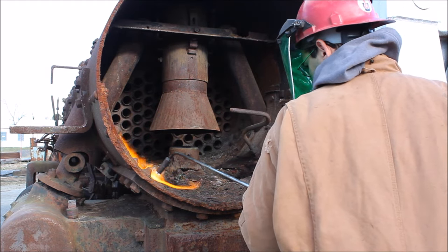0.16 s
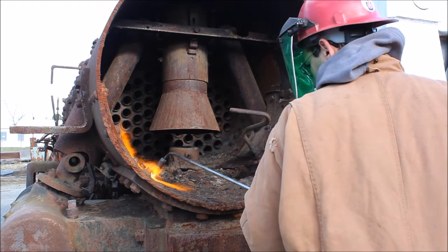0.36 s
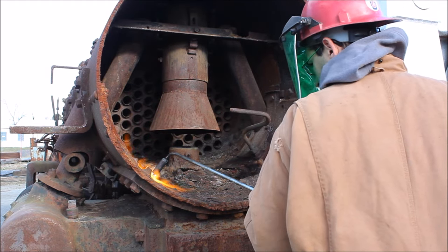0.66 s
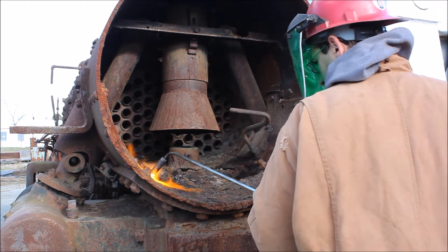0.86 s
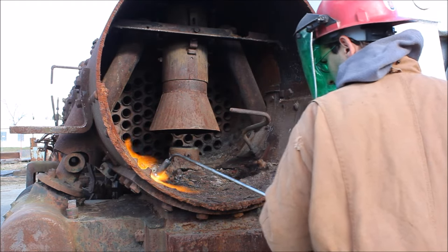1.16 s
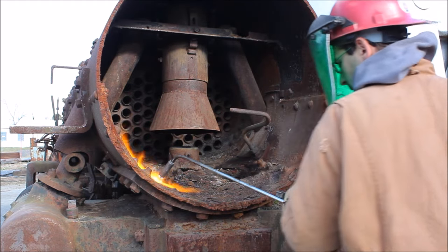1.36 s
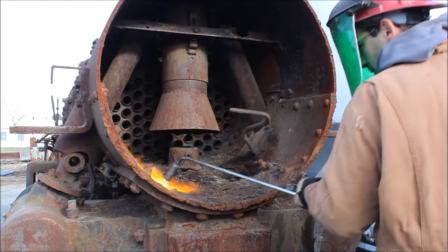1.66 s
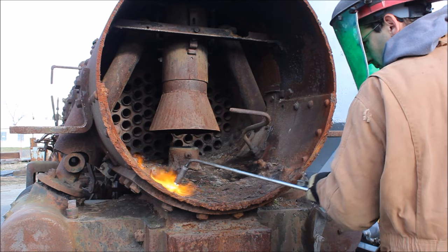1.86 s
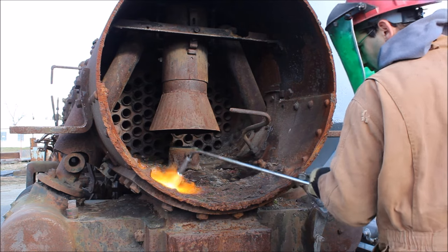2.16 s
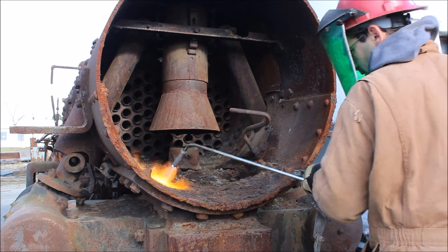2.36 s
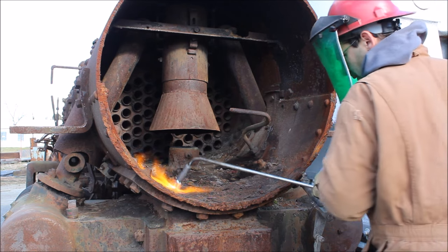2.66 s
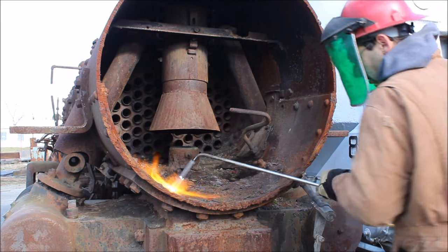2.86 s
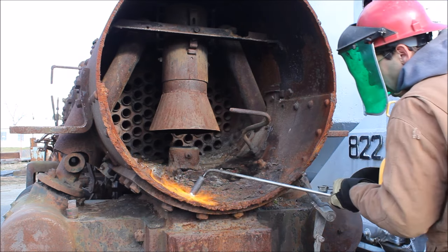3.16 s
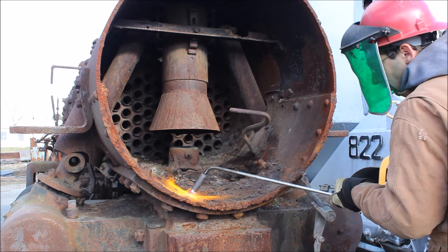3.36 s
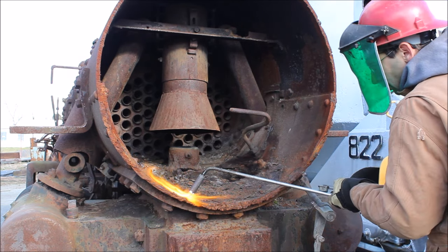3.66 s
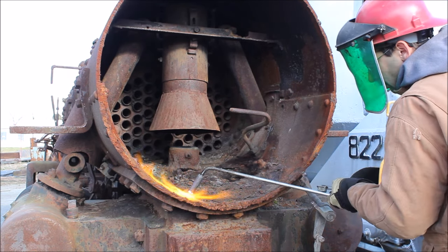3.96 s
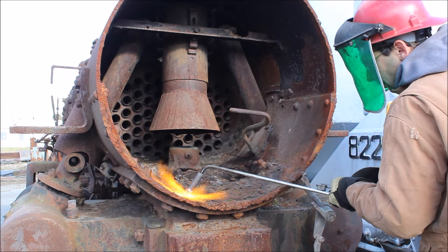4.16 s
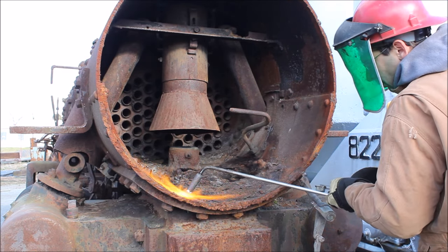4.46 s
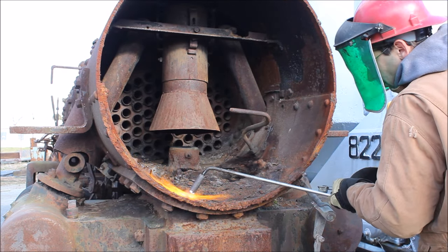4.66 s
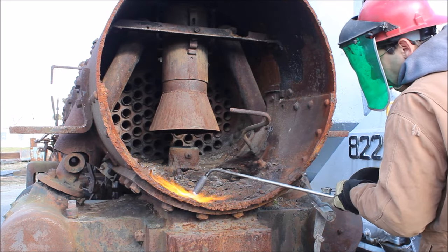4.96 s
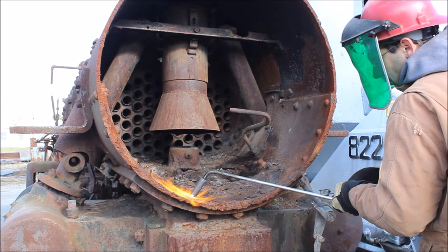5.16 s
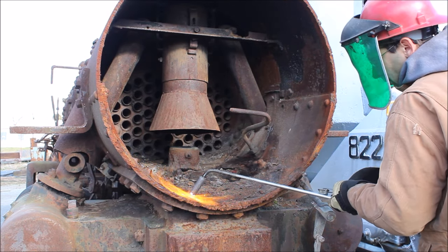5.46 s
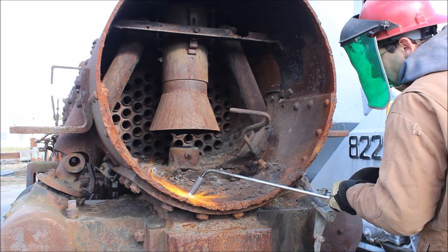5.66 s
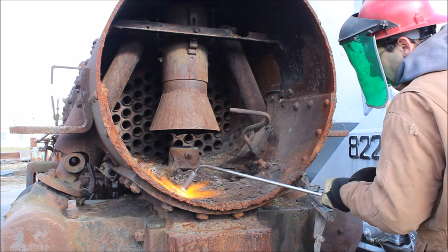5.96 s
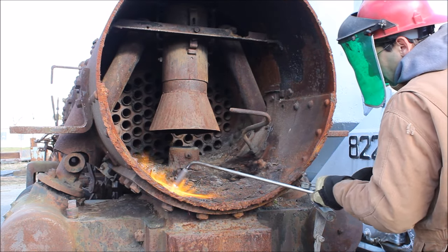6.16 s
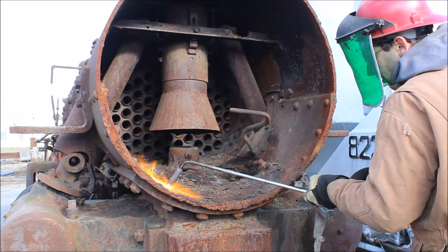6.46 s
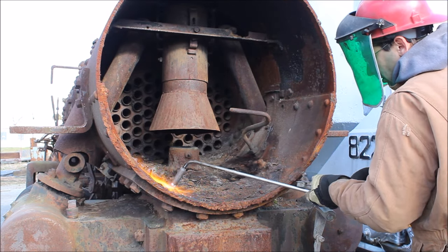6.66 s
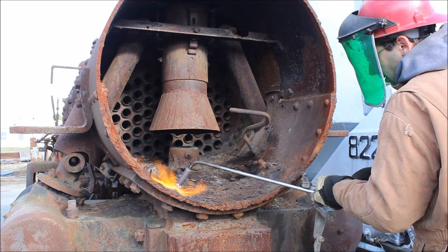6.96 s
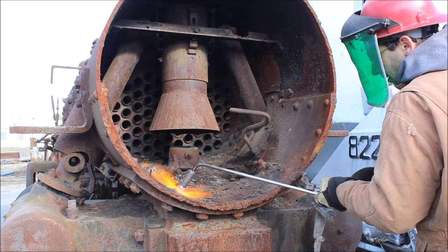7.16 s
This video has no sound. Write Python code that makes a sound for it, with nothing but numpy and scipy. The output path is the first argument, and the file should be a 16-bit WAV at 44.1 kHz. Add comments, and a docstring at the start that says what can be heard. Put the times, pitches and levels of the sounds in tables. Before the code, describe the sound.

A gas torch burns for the whole seven seconds or so, aimed into the mouth of a large rusty steel drum outdoors and heard through one nearby microphone. The main sound is a bright, turbulent hiss with a fine sizzle on top, swelling and sagging slightly as the nozzle moves. Beneath it a softer flame roar flickers, and the round wall gives both a hollow, shifting colour. The sizzle flares several times between about 2 and 3 seconds, and again near 4 and 6 seconds. Wind buffets the microphone in irregular low rumbles and short soft thumps, strongest in the first third of a second and again from about 5.5 to 7 seconds. Scattered throughout, the noise thins for a split second to faint glassy tones, most noticeably near 3.9, 4.1, 5.5 and 6.6 seconds. The torch is still burning at the end.

```python
"""Gas torch in a steel drum

A heating torch plays on rust and dirt in the mouth of a large steel drum, out of doors. The turbulent
jet hisses and fizzes, the flame roars, and the round wall reflects both a few milliseconds late.
Wind buffets the single microphone in low lumps; now and then the sound thins for an instant to a few
glassy tones."""
import sys
import numpy as np
from scipy import signal
from scipy.fft import rfft, irfft, next_fast_len
from scipy.io import wavfile
from scipy.ndimage import uniform_filter1d, map_coordinates

SR = 44100
rng = np.random.default_rng(int(sys.argv[2]) if len(sys.argv) > 2 else 0)


def persist_wave(psi):
    """Save psi, clipped to +-1, as 16-bit WAV."""
    counts = np.round(np.clip(psi, -1, 1) * 32767).astype(np.int16)
    wavfile.write(sys.argv[1], SR, np.atleast_2d(counts).T)


N = 321930
TIME = np.arange(N) / SR
FFT_SIZE = next_fast_len(N + 8192)
FREQ = np.fft.rfftfreq(FFT_SIZE, 1 / SR)

# the jet swells and sags as the nozzle sweeps: (time [s], level [dB])
JET_LEVEL = [(0.0, -24.5), (0.1, -21), (0.22, -23.5), (0.28, -18.5), (0.34, -24), (0.36, -19), (0.98, -19),
             (1.02, -17), (1.16, -21), (1.42, -19), (1.48, -23), (1.68, -18.5), (2.36, -21), (2.46, -24),
             (2.56, -21.5), (2.66, -19.5), (2.79, -17.5), (2.86, -24), (2.93, -20.5), (3.27, -18),
             (3.64, -20), (3.66, -17.5), (3.88, -19), (3.92, -22.5), (4.0, -20), (4.25, -22), (4.29, -18),
             (4.63, -20.5), (4.65, -18), (5.29, -19.5), (5.77, -18.5), (5.81, -22), (5.98, -20),
             (6.04, -22), (6.49, -18.5), (7.3, -19.5)]


def torch(roar_gain, jet_gain):
    """Turbulent burning: one flicker modulates the amplitude of roar, hiss and fizz together."""
    flicker = amp(0.5 * wobble(22))
    return flicker * (roar_gain * flame_roar() + jet_gain * (jet_hiss() + jet_fizz()))


def jet_hiss():
    """Jet turbulence radiates broadband noise, brighter or hollower as the nozzle turns."""
    # spectra of the two bands: (frequency [Hz], relative level [dB])
    upper_band = [(2530, -39), (4300, -0.5), (5860, 1), (7380, -3.5), (8000, -5.5), (10400, -56),
                  (17600, -120)]
    hollow_band = [(1290, -26), (2200, -4), (2340, -8.5), (2770, 0.5), (3390, 1.5), (4300, -2), (5590, -64),
                   (9460, -120)]
    # hollow band against upper band: (time [s], balance [dB])
    balance = [(0, 1), (.5, -3), (.8, 3.5), (.95, 1), (1.1, -1), (1.3, 2), (1.75, 0), (2.0, 0.5), (2.4, -4),
               (2.8, 1.5), (3.1, -0.5), (3.3, -1), (3.6, 0.5), (4.0, -3.5), (4.35, 2), (4.7, -0.5),
               (5.1, 0), (5.5, -2), (5.85, -1.5), (6.0, -3), (6.3, -0.5), (6.6, -0.5), (7.0, -1.5),
               (7.3, 3)]
    upper, hollow = rush(upper_band, patchy_db=1.5), rush(hollow_band, patchy_db=0.7)
    jet = blend(upper, hollow, curves(balance)[0] - 1.5 * wobble(3.7))
    level_db = curves(JET_LEVEL)[0] + 0.12 * wobble(25) + 0.58 * wobble(9.9)
    return amp(level_db) * drum(jet)


def jet_fizz():
    """The highest jet noise partly follows the jet's level and brightens as it flares."""
    # spectra of the fizz and of the sizzle above it: (frequency [Hz], relative level [dB])
    fizz_band = [(4100, -24.5), (7000, -3.5), (8200, 2), (10200, -1.5), (12000, -59)]
    sizzle_band = [(8500, -44), (10200, -2), (12400, -0.5), (14500, -3.5), (15500, -3.5)]
    # sizzle against fizz: (time [s], balance [dB])
    brightness = [(0, 3), (1.9, 1.5), (2.8, 2.5), (3.6, 1), (4.0, -2.5), (4.3, 2.5), (6.3, -1), (7.3, 4.5)]
    # Gaussian swells: (time [s], half width [s], rise [dB])
    flares = [(.22, 0.064, 2.5), (.75, 0.28, 1), (1.443, 0.094, 3), (1.72, 0.06, 1.5), (1.933, 0.017, 5),
              (2.09, 0.055, 5.5), (2.357, 0.071, 7), (2.65, 0.045, 4.5), (2.868, 0.1, 6), (3.088, 0.028, 4),
              (3.257, 0.025, 3.5), (3.427, 0.08, 1.5), (3.753, 0.12, 3), (4.11, 0.066, 4.5),
              (4.488, 0.053, 1.5), (5.105, 0.05, 2.5), (5.325, 0.059, 1.5), (5.71, 0.055, 1.5),
              (5.92, 0.16, 2), (6.16, 0.043, 4), (7.045, 0.033, 4)]
    flare_db = sum(db * np.exp(-((TIME - s) / width) ** 2) for s, width, db in flares)
    fizz = drum(rush(fizz_band, patchy_db=2.0))
    sizzle = amp(1.8 * wobble(45) + 0.26 * wobble(22)) * rush(sizzle_band, patchy_db=-0.5)
    spray = blend(fizz, sizzle, curves(brightness)[0] + 0.41 * flare_db)
    jet_db = curves(JET_LEVEL)[0]
    level_db = -22.5 + 0.39 * (jet_db - jet_db.mean()) + flare_db + 0.15 * wobble(8.9)
    return amp(level_db) * spray


def flame_roar():
    """Combustion noise excites the air in the drum; two shelving filters vary its low end."""
    # spectrum of the flame: (frequency [Hz], relative level [dB])
    roar_band = [(260, -17), (450, -10.5), (600, -19), (800, -4.5), (1300, -2), (2600, -2.5), (3380, -33),
                 (5720, -120)]
    # strength of the flame: (time [s], level [dB], low shelf drive [dB])
    flame = [(0, -31.5, 2), (.2, -28, -1.3), (1.0, -27, -3), (1.12, -28.5, -5), (1.4, -27, 2),
             (1.52, -29.5, -1), (1.7, -26.5, -4.5), (2.0, -28.5, 1), (2.1, -31, -0.5), (2.44, -33, 3),
             (2.6, -31.5, 7), (2.73, -26.5, 3.5), (2.85, -29.5, 2), (3.2, -30.5, -1), (3.55, -32, 1),
             (3.7, -28, 0.7), (3.9, -35.5, -0.5), (4.2, -30, -1.8), (4.85, -28.5, 1), (5.3, -31.5, -3.5),
             (5.7, -32, 3), (6.0, -33.5, -0.5), (6.45, -27.5, 1), (6.75, -29.5, 2), (7.0, -29.5, 4),
             (7.3, -27, 0.5)]
    # swings of the deepest roar: (time [s], deep shelf drive [dB])
    depth = [(0, 1), (.7, -1), (1.2, 2.5), (1.7, -0.5), (2.3, 2.5), (2.9, 2), (3.4, -0.5), (3.9, -2.5),
             (4.4, -2), (5.0, -3), (5.5, -1), (6.0, -0.5), (6.6, -3), (7.3, 1)]
    # shelf shapes: (frequency [Hz], gain [dB])
    low_shelf = [(850, -3.5), (1300, -51)]
    deep_shelf = [(590, 2.5), (640, -40)]
    level_db, low_db = curves(flame)
    roar = amp(level_db + wobble(12)) * drum(air_modes(rush(roar_band, patchy_db=1.5)))
    roar += (amp(low_db) - 1) * coloured(roar, low_shelf)
    return roar + (amp(curves(depth)[0]) - 1) * coloured(roar, deep_shelf)


def air_modes(x):
    """Cavity resonance: each mode interferes with the direct sound, leaving a hollow above its peak."""
    # modes of the air in the drum: (frequency [Hz], bandwidth [Hz], strength [dB])
    modes = [(517, 6.6, -10), (641.6, 20, 23), (749, 76, 7), (1040, 21, -4), (1170, 25, -2.5),
             (1267, 19, 5), (1680, 130, -3.5), (1838, 22, -5), (2157, 35, -1)]
    response = sum(amp(db) * width * (1j * FREQ + hz / 2) / (hz ** 2 - FREQ ** 2 + 1j * FREQ * width)
                   for hz, width, db in modes)
    return irfft(rfft(x, FFT_SIZE) * (amp(6) + response), FFT_SIZE)[:N]


def drum(x):
    """Comb filtering: wall echoes add to the direct sound, their delays trembling with the flame."""
    # delays as the torch moves: (time [s], near rim [ms], side wall [ms], tube plate [ms], far wall [ms])
    paths = [(0, 3.4, 4.9, 6.76, 8.2), (1.2, 3.44, 6.17, 7.2, 11.2), (1.9, 1.98, 6.06, 8.2, 9.7),
             (2.6, 1.15, 5.5, 8.7, 13.3), (3.7, 1.27, 5.54, 7.2, 9.3), (4.1, 2.43, 5.35, 7.1, 9.15),
             (5.5, 2.68, 4.83, 8.4, 10.4), (6.1, 3.3, 5.9, 9.3, 11.2), (7.3, 2.9, 6.5, 7.1, 8.8)]
    # strength of each path: (gain [dB])
    path_db = [-11, -5.5, -5, -4]
    # colour of an echo from the rusty wall: (frequency [Hz], gain [dB])
    rust = [(500, -13), (2000, -1.5), (5000, 3), (12000, 2.5)]
    reflected = coloured(x, rust)
    delays_ms = [ms + 0.029 * wobble(2.884) for ms in curves(paths)]
    echoes = [map_coordinates(reflected, [np.arange(N) - ms * SR / 1000], order=1) for ms in delays_ms]
    # later bounces blur into a short ring that changes colour as the flame wanders
    ring_time, rt60_s = np.arange(SR // 8) / SR, 0.2
    rings = rng.standard_normal((3, len(ring_time))) * amp(-60 * ring_time / rt60_s)
    tails = signal.fftconvolve(reflected[None], rings / np.linalg.norm(rings[0]), axes=1)[:, :N]
    weights = np.array([wobble(1.6) for _ in tails])
    tail = np.sum(tails * weights, axis=0) / np.linalg.norm(weights, axis=0)
    return unit(x + amp(path_db) @ np.array(echoes) + amp(-3) * tail)


def wind_buffets():
    """Eddies press on the microphone in lumps of rumble and flutter that rise fast and fall slower."""
    # (time [s], length [s], rumble level [dB], flutter against rumble [dB])
    buffets = [(0.03, 0.054, -38.5, 9), (0.2, 0.075, -28, -1), (0.25, 0.13, -32.5, -1),
               (0.505, .03, -56, 6), (0.616, 0.081, -33, -12), (0.813, .07, -37, -4),
               (0.956, 0.19, -41.5, 0), (1.398, 0.059, -39, -12), (1.62, 0.025, -29, -7),
               (1.72, 0.023, -32, -4), (1.825, 0.14, -36.5, -0.5), (2.215, .2, -57, 16),
               (2.503, 0.065, -64, 7), (2.613, 0.053, -46, 10), (2.754, 0.028, -31.5, -5),
               (2.91, .06, -38, -13), (3.01, .06, -39.5, 4.5), (3.222, 0.028, -35, -5),
               (3.298, 0.027, -32, -18), (3.432, 0.04, -39.5, 3.5), (3.64, 0.15, -40.5, -19),
               (4.003, .12, -42.5, -14), (4.277, 0.062, -32, -6), (4.476, 0.25, -34.5, -4.5),
               (4.786, 0.1, -39, -4), (5.082, 0.13, -32, -6), (5.23, 0.044, -32.5, -4.5),
               (5.448, 0.016, -43, -4), (5.568, 0.075, -31.5, -1), (5.666, 0.099, -29.5, -5.5),
               (5.814, 0.034, -38, -6), (5.976, .03, -37, -8), (6.064, 0.02, -40, 8),
               (6.144, 0.027, -39, 11), (6.19, 0.075, -32, -1), (6.374, 0.023, -24.5, -11),
               (6.422, 0.015, -32.5, -17), (6.53, 0.054, -32.5, -11), (6.68, 0.17, -34.5, 1),
               (6.873, 0.083, -28.5, -8), (7.005, 0.02, -30, -22), (7.13, .06, -44, -1),
               (7.3, 0.11, -33, -10)]
    # pressure spectra: (frequency [Hz], relative level [dB])
    rumble_band = [(12, -40), (20, -13.5), (75, 2.5), (180, -9.5), (230, -15), (400, -120)]
    flutter_band = [(82, -19), (140, 5), (413, -6), (482, -21), (520, -5.5), (680, -27), (1140, -120)]
    rise_db, fall_db = 12.5, 8  # per buffet length
    s, length, rumble_db, flutter_db = np.transpose(buffets)[..., None]
    t = TIME[::44]
    shape = amp(np.minimum(rise_db * (t - s), fall_db * (s - t)) / length)

    def envelope(peak_db, calm_db):
        power = np.sum((amp(peak_db) * shape) ** 2, axis=0) + amp(calm_db) ** 2
        return np.interp(TIME, t, np.sqrt(power))

    lumps = wobble(45)
    rumble = unit(amp(1.7 * lumps) * rush(rumble_band, patchy_db=0.5))
    flutter = unit(amp(3.5 * lumps + 2.2 * wobble(70)) * rush(flutter_band, patchy_db=1.0))
    return (envelope(rumble_db, calm_db=-58.5) * rumble
            + envelope(rumble_db + flutter_db, calm_db=-50) * flutter)


def wind_puffs():
    """Each sharp puff is a wave packet: a cycle or two of low pressure swing in random phase."""
    # (time [s], envelope peak [dB], frequency [Hz])
    puffs = [(0.044, -21, 140), (0.127, -17, 178), (.163, -21, 220), (0.205, -16, 520), (.208, -14, 190),
             (0.285, -24, 199), (0.6, -24, 80), (0.954, -26, 170), (1.629, -29, 200), (1.828, -22, 130),
             (4.459, -19, 180), (5.106, -19, 190), (5.525, -26, 45), (5.57, -22, 170), (5.585, -22, 200),
             (5.606, -20, 150), (5.651, -24, 200), (5.666, -21, 90), (5.712, -20, 100), (5.726, -24, 130),
             (5.753, -23, 240), (5.823, -24, 149), (5.832, -27, 150), (6.137, -21, 340), (6.186, -16, 150),
             (6.221, -25, 180), (6.358, -23, 280), (6.403, -26, 250), (6.651, -20.5, 200),
             (6.679, -18, 250), (6.781, -27, 130), (6.914, -18, 70), (6.936, -15.5, 218), (7.005, -24, 120)]
    reach, half_width_cycles = SR // 40, 0.48
    pressure, t = np.zeros(N + SR), np.arange(-reach, reach) / SR
    for s, db, hz in puffs:
        envelope = amp(db) * np.exp(-(t * hz / half_width_cycles) ** 2)
        start = round(s * SR) - reach
        pressure[start:start + len(t)] += envelope * np.cos(2 * np.pi * (hz * t + rng.random()))
    return pressure[:N]


def glassy_dips(count=20):
    """Brief crossfades from noise to sine tones; returns the wind, roar and jet gains, and the tones."""
    # (time [s], half length [ms], wind gain [dB], roar gain [dB], jet gain [dB], base tone level [dB])
    dips = [(.066, 5.5, 2, -16, -10, -28.5), (.236, 4.1, -1, -3, -22, -27),
            (0.856, 5.4, -14, -6, -27, -24.5), (1.049, 5, -10, -1, -14, -24.5),
            (1.198, 2.6, -20, -9, -30, -26), (1.751, 8.7, -10, -12, -24, -24.5),
            (2.796, 6.4, -10, -18, -20, -24), (2.881, 5.9, -18, -20, -9, -26.5),
            (3.416, 3.8, -20, -24, -19, -24), (3.776, 4, -22, -22, -13, -25),
            (3.852, 11.4, -25, -27, -39, -24), (3.907, 2, -12, -24, -31, -25),
            (4.055, 4, -22, -29, -10, -24.5), (4.13, 14, -29, -26, -32, -28),
            (4.247, 4.9, -12, -17, -20, -25), (4.526, 7.3, -2, -23, -9, -27),
            (4.607, 4.5, -8, -8, -22, -23.5), (4.801, 4.1, -4, -5, -18, -25),
            (5.079, 4.2, -6, -12, -22, -23), (5.228, 3.3, -24, -24, -20, -25),
            (5.472, 13.8, -42, -42, -32, -24.5), (5.527, 3.2, -6, -19, -5, -27),
            (5.634, 3.8, -17, -26, -7, -24), (5.824, 4.5, -6, -28, -23, -27),
            (5.953, 4.1, -19, -21, -22, -23.5), (6.38, 4.5, -6, -7, -21, -25.5),
            (6.424, 5, -1, -5, -24, -24.5), (6.627, 13, -39, -36, -29, -25.5),
            (6.894, 5.5, 4, -6, -30, -25.5), (6.979, 4.6, -14, -15, -27, -22.5),
            (7.191, 6.9, -9, -9, -26, -24.5)]
    # distribution of the tones: (frequency [Hz], share of tones below [0-1])
    spread = [(1900, 0), (2700, .07), (4400, .38), (6800, .68), (9000, .84), (14500, 0.99)]
    hz, share = np.transpose(spread)
    reach, edge_ms, tilt_db_per_octave = SR // 25, 17.4, -1.5
    gains, tones, t = np.ones((3, N + SR)), np.zeros(N + SR), np.arange(-reach, reach) / SR
    for s, half_ms, *depth_db, tone_db in dips:
        offset, phase, size, chance = rng.random((4, count, 1))
        span = slice(round(s * SR) - reach, round(s * SR) + reach)
        outside = np.sin(np.pi / 2 * np.clip((abs(t) * 1000 - half_ms) / edge_ms + 0.16, 0, 1))
        gains[:, span] *= outside + (1 - outside) * amp(depth_db)[:, None]
        rank = abs(np.arange(count)[:, None] + 4 * offset - 1.5) / (count + 1.5)
        pitch = np.interp(rank * share[-1], share, hz)
        tilt_db = tilt_db_per_octave * np.log2(np.maximum(pitch / 4000, 1))
        kept = min(1, 0.3 + half_ms / 18)  # short gaps hold fewer, stronger tones
        strength = (chance < kept) / np.sqrt(kept) * amp(tone_db + tilt_db + 11.6 * (size - 1))
        chord = np.sum(strength * np.sin(2 * np.pi * (pitch * t + phase)), axis=0)
        tones[span] += np.sqrt(1 - outside ** 2) * chord
    return *gains[:, :N], tones[:N]


def rush(spectrum, patchy_db):
    """Turbulence as shaped noise of rms 1, with patches of random gain in time and frequency."""
    cells = signal.stft(rng.standard_normal(N), nperseg=512)[2]
    patches = uniform_filter1d(rng.standard_normal(cells.shape), size=6, axis=0)
    patches = uniform_filter1d(patches, size=8, axis=1)
    noise = signal.istft(cells * amp(patchy_db * unit(patches)), nperseg=512)[1][:N]
    return unit(coloured(noise, spectrum))


def coloured(x, spectrum):
    """Zero-phase filtering through (frequency [Hz], gain [dB]) points joined on a log axis."""
    hz, db = np.transpose(spectrum)
    gain = amp(np.interp(np.log(FREQ + 1), np.log(hz + 1), db))
    return irfft(rfft(x, FFT_SIZE) * gain, FFT_SIZE)[:N]


def blend(a, b, b_db):
    """Constant-power mix of two independent noises."""
    return (a + amp(b_db) * b) / np.sqrt(1 + amp(2 * b_db))


def wobble(rate):
    """Smooth random modulation, with rate knots a second."""
    knots = rng.standard_normal(int(N * rate / SR) + 4)
    return map_coordinates(knots, [TIME * rate])


def curves(rows):
    """Linear interpolation, to every sample, of each column after the time."""
    times, *columns = np.transpose(rows)
    return [np.interp(TIME, times, column) for column in columns]


def amp(db):
    """Decibels to amplitude ratio."""
    return 10 ** (np.asarray(db) / 20)


def unit(x):
    """Normalisation to rms 1."""
    return x / np.sqrt(np.mean(x ** 2) + 1e-20)


def scene():
    """Torch and wind in mono, thinning now and then to brief glassy tones; both channels alike."""
    wind_gain, roar_gain, jet_gain, tones = glassy_dips()
    mono = torch(roar_gain, jet_gain) + tones + wind_gain * wind_buffets() + wind_puffs()
    return np.tile(mono, (2, 1))


def record(dry):
    """Band limiting by an ideal low-pass filter."""
    cutoff_hz = 15780
    return irfft(rfft(dry, FFT_SIZE) * (FREQ < cutoff_hz), FFT_SIZE)[:, :N]


dry = scene()
out = record(dry)
persist_wave(out)
```